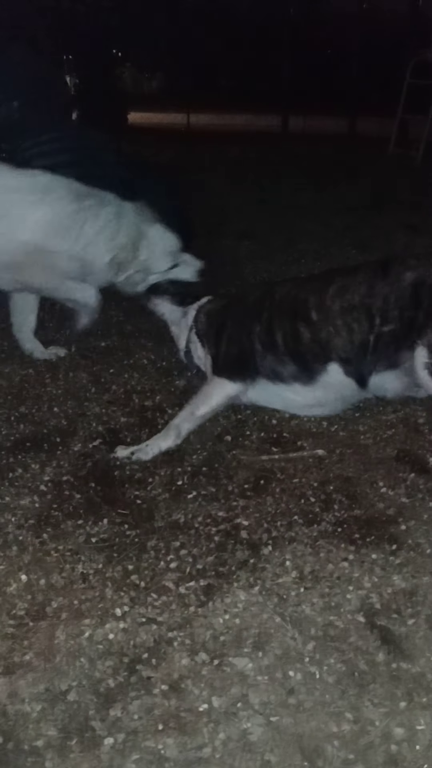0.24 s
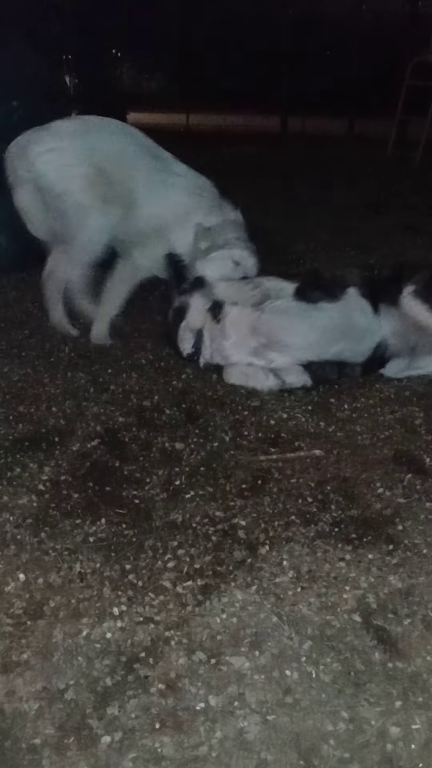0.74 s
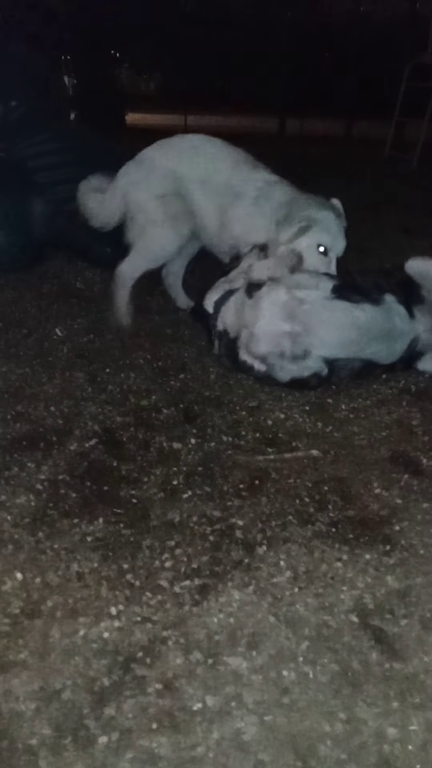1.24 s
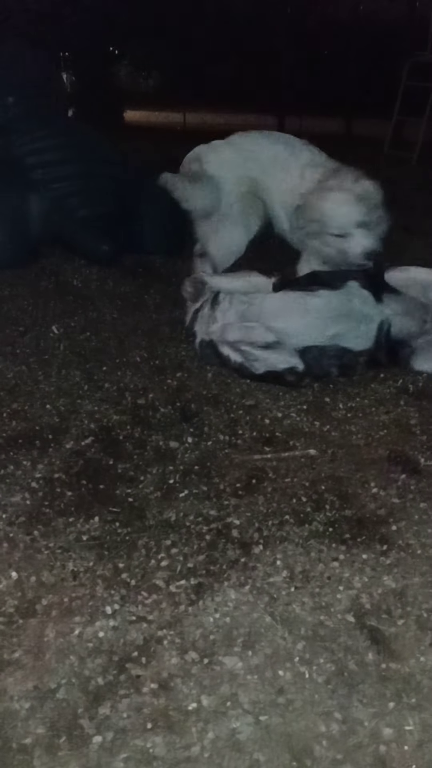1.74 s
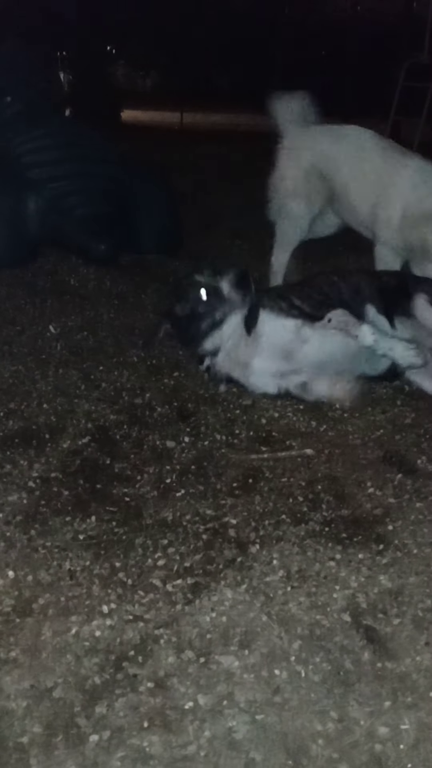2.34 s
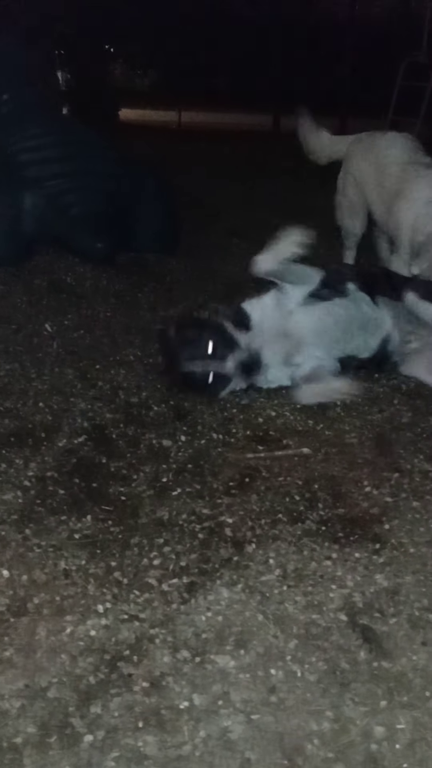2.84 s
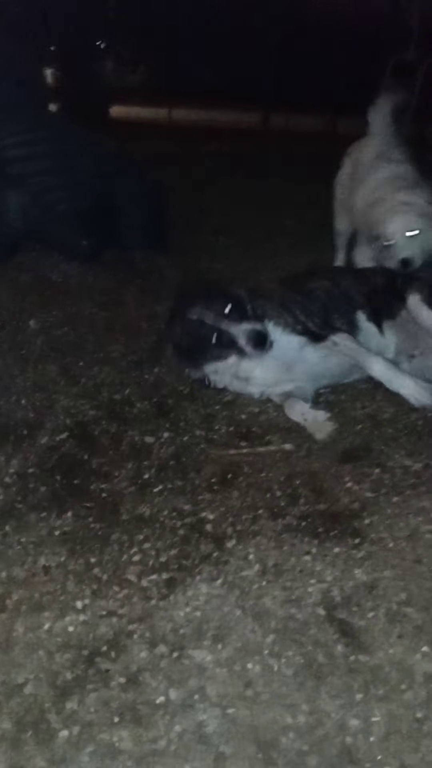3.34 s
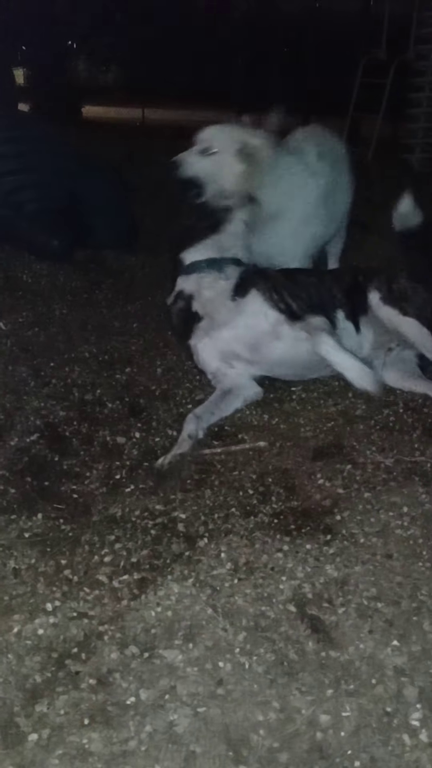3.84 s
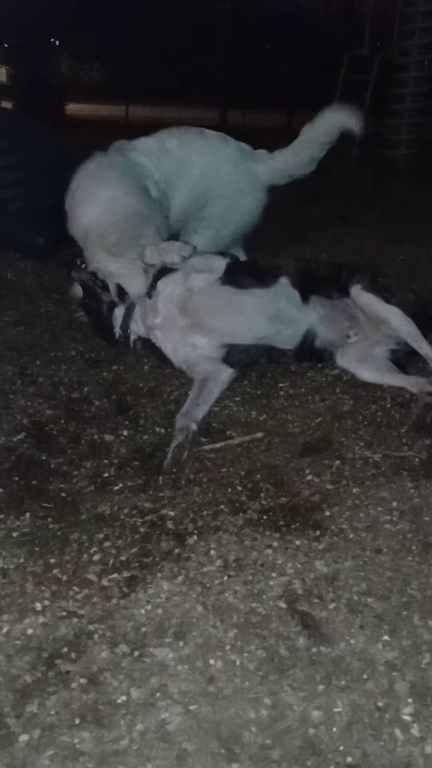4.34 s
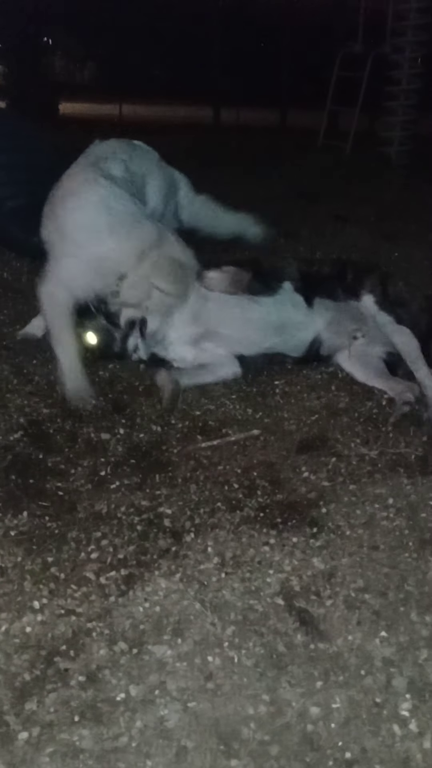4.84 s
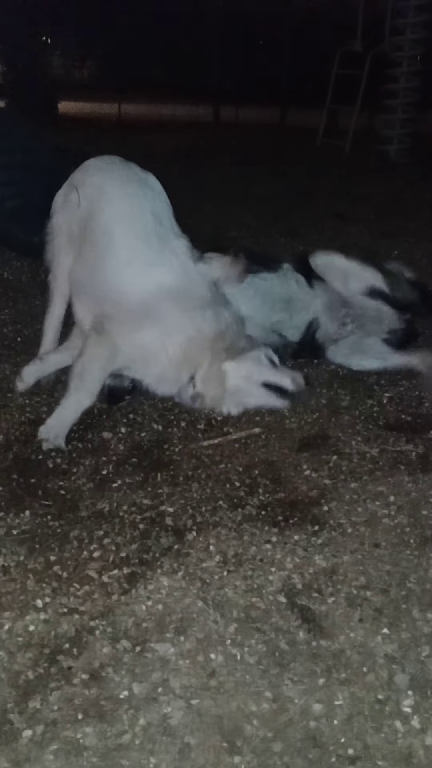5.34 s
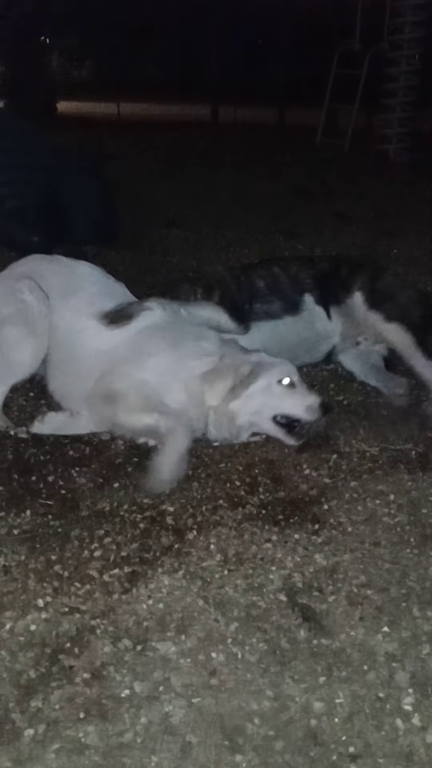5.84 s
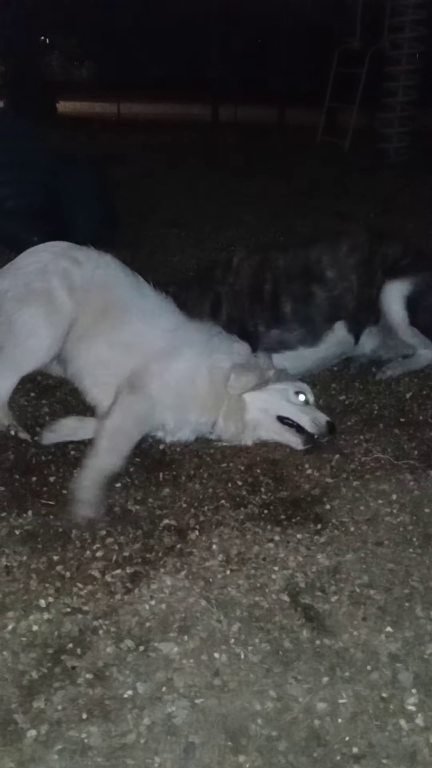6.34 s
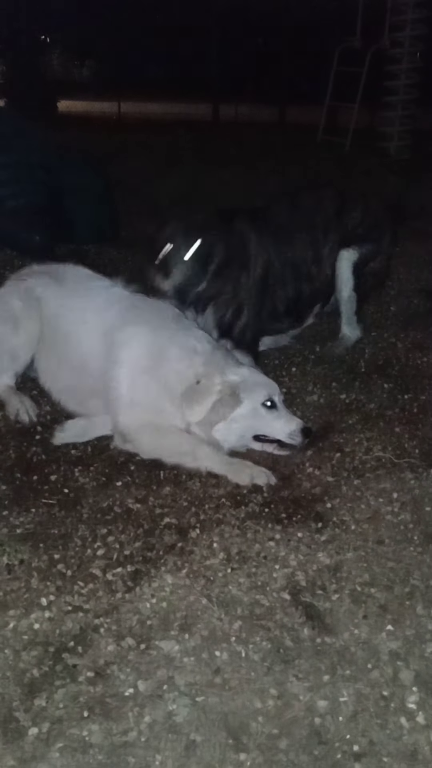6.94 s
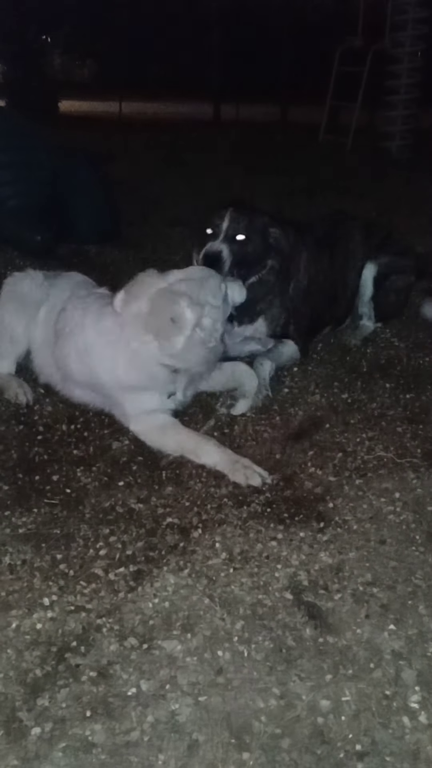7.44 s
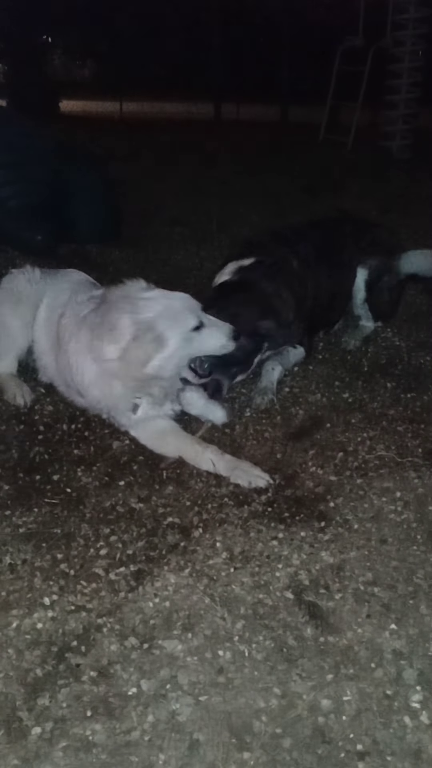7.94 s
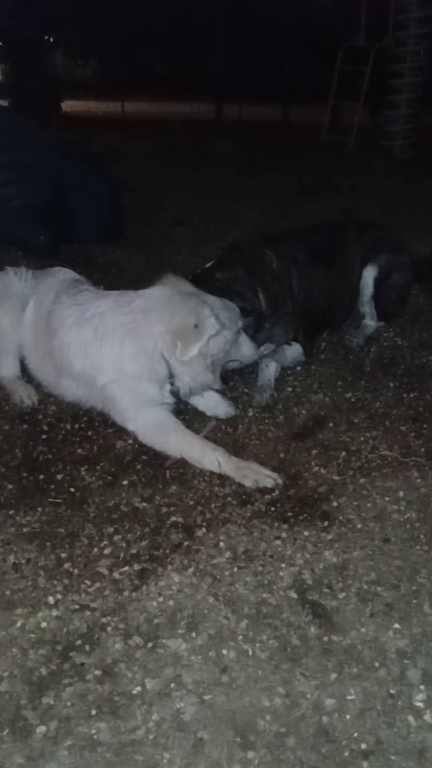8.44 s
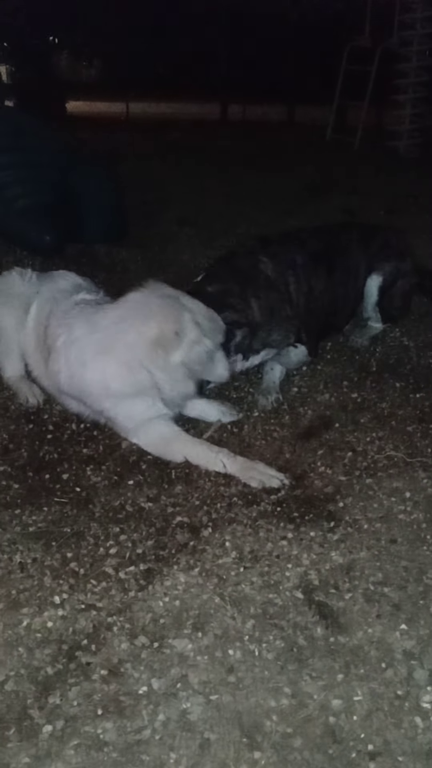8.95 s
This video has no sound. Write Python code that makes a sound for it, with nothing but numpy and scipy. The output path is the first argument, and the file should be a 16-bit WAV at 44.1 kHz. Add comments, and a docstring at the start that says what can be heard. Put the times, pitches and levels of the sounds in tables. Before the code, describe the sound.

Bright gravel scrapes and sudden paw kicks as two dogs wrestle, low breathy growls, hollow mouth snaps and small metallic clinks over faint rumble.

```python
"""Dogs wrestling on gravel

Two dogs wrestle on loose gravel in a quiet yard at night. Bodies and paws grind and kick the stones:
filtered noise and random contacts. Pebbles tick, soft bodies thud, and collar tags ring in decaying modes.
Jaws clop as a brief cavity tone; hoarse huffs and growls are throat pulses and breath through resonances.
Thin squeaks glide as sine tones. A low distant rumble and a faint hiss are steady shaped noise."""
import sys
import numpy as np
from scipy import signal
from scipy.fft import rfft, irfft
from scipy.io import wavfile
from scipy.ndimage import map_coordinates

SR = 44100
rng = np.random.default_rng(int(sys.argv[2]) if len(sys.argv) > 2 else 0)


def store_pcm(level_fs):
    """Save levels as 16-bit WAV."""
    pcm = np.round(np.clip(level_fs, -1, 1) * 32767).astype(np.int16)
    wavfile.write(sys.argv[1], SR, np.atleast_2d(pcm).T)


N = 406161
T = np.arange(N) / SR
# spectrum of stones striking each other at the surface: frequency_hz, level_db
GRAVEL = [(1760, -38), (3000, -16.5), (3570, -17), (4440, -11), (5040, -1.5), (6220, 1), (7350, -10.5),
          (8170, -1), (8520, 0), (10200, -9.5), (11600, -21), (12800, -12.5), (13800, -19), (15100, -11),
          (16000, -43)]


def from_db(db):
    """Level to amplitude ratio: 20 dB is a factor of ten."""
    return 10 ** (np.asarray(db) / 20)


def rms_one(x):
    """Normalization of mean power: scale to unit rms."""
    return x / np.sqrt(np.mean(x ** 2) + 1e-20)


def in_time(rows):
    """Linear interpolation: join (time, value) rows by straight lines."""
    return np.interp(T, *np.transpose(rows))


def drift(rate, size=N):
    """Random modulation: Gaussian knots, rate of them a second up to 1000, joined to a spread near 1."""
    knots = rng.standard_normal(size // 40 + 2)
    return 1.22 * np.interp(np.arange(size) * min(rate, 1000) / SR, np.arange(len(knots)), knots)


def colour(x, spectrum, size=2048):
    """Minimum-phase filtering: a causal unit-energy kernel follows a (Hz, dB) spectrum."""
    hz, db = np.transpose(spectrum)
    grid = np.maximum(np.arange(size // 2 + 1) * SR / size, 1)
    gain = from_db(np.interp(np.log(grid), np.log(hz), db))
    # folding the cepstrum onto positive times makes the kernel causal
    cepstrum = irfft(np.log(gain))
    cepstrum[1:size // 2] *= 2
    cepstrum[size // 2 + 1:] = 0
    kernel = irfft(np.exp(rfft(cepstrum)))
    return signal.oaconvolve(x, kernel / np.linalg.norm(kernel))[:len(x)]


def patchy(x, patchy_db, patch_hz, patch_s, size=512):
    """Time-varying filtering: random bumps in the spectrum keep shifting the colour."""
    hz, s, cells = signal.stft(x, SR, nperseg=size)
    knots = rng.standard_normal((160, 600))
    places = np.meshgrid(hz / patch_hz, s / patch_s, indexing="ij")
    field = map_coordinates(knots, places, order=1, mode="wrap")
    return signal.istft(cells * from_db(patchy_db * (field - 0.0854)), SR, nperseg=size)[1][:N]


def resonate(x, hz, width_hz):
    """Two-pole resonance with gain near 1 on top; damping sets its width."""
    r = np.exp(-np.pi * width_hz / SR)
    numerator = np.array([1, 0, -1]) * (1 - r * r) / 2
    return signal.lfilter(numerator, [1, -2 * r * np.cos(2 * np.pi * hz / SR), r * r], x + 1e-18)


def cut(x, hz, kind, order=2):
    """Butterworth filtering: a maximally flat passband."""
    return signal.sosfilt(signal.butter(order, np.minimum(hz, .45 * SR), kind, fs=SR, output="sos"), x)


def add(track, s, sound):
    """Superposition: mix a sound in at time s."""
    at = int(s * SR)
    track[at:at + len(sound)] += sound[:N - at]


def early_echo(x, echo_s=0.001783, echo_share=0.22):
    """Comb filtering: a close, inverted reflection cuts the midrange into bands."""
    reflection = np.interp(T - echo_s, T, x, left=0)
    return (x - echo_share * reflection) / np.hypot(1, echo_share)


def grains(per_s, spread_db, bed):
    """Random impulse train: contacts of scattered size and sign on a bed of noise."""
    sizes = from_db(spread_db * np.minimum(rng.exponential(1, N), 4.0)) * rng.choice([-1, 1], N)
    clicks = rms_one(sizes * (rng.random(N) < per_s / SR))
    return rms_one(clicks + bed * rng.standard_normal(N))


def heave(s, db, swell_s, fade_s):
    """Power envelope of one movement or breath: it builds up to its strongest at s and dies away."""
    drop_db, roundness = 11, 1.45   # fall over one swell or fade time; 1 = pointed top, 2 = bell
    away = np.maximum((s - T) / swell_s, (T - s) / fade_s)
    near, power = away < 4, np.zeros(N)
    power[near] = from_db(db - drop_db * away[near] ** roundness) ** 2
    return power


def slide_strength():
    """Addition of powers: shuffling, slides and one airy breath drive the surface and deeper layers."""
    # restless shuffling of both dogs, under the separate moves: time_s, crunch_db
    shuffle = [(0.0, -51.5), (0.28, -42.5), (0.72, -46.5), (1.4, -45), (1.7, -52.5), (2.1, -53),
               (2.24, -43), (2.9, -47.5), (3.7, -49.5), (3.98, -45.5), (4.15, -55.5), (4.96, -47.5),
               (5.3, -40.5), (7.35, -40.5), (7.7, -52.5), (8.0, -52), (8.35, -62), (8.7, -56.5)]
    # a body or leg slides through the gravel; the long soft rasp at 8.84 s is a dog's airy breath.
    # time_s is the strongest moment: time_s, crunch_db, swell_s, fade_s, deep_db (against the crunch)
    slides = [(0.55, -45, 0.051, 0.2, -6.5), (0.92, -30.5, 0.088, 0.059, -21.5),
              (1.07, -29.5, 0.12, 0.093, -24), (1.23, -38.5, 0.066, 0.064, -43),
              (1.55, -43, 0.09, 0.084, -9), (1.82, -42, 0.047, .04, -7), (2.0, -43, 0.1, 0.064, -7),
              (2.58, -31, 0.091, 0.12, -15.5), (2.811, -25.5, 0.078, 0.045, -7),
              (3.06, -33, 0.059, 0.029, -21), (3.23, -35, 0.12, 0.056, -38), (3.53, -40, 0.075, 0.12, -10),
              (4.29, -42, 0.097, 0.085, -13.5), (4.62, -41, 0.07, 0.049, -16),
              (4.79, -47, 0.053, 0.11, -4.5), (5.21, -32.5, 0.094, .1, -12.5),
              (5.37, -35, 0.068, 0.054, -38), (5.9, -31, 0.12, 0.062, -24), (6.03, -33.5, 0.12, .07, -17),
              (6.55, -39.5, 0.056, 0.28, -6.5), (6.7, -33, 0.1, 0.037, -12.5), (6.87, -36, 0.22, 0.13, -47),
              (7.139, -27, 0.046, 0.034, -17), (7.32, -35.5, 0.097, 0.055, -16),
              (8.84, -57.5, 0.53, 0.39, 2), (9.19, -48.5, 0.084, 0.087, -30)]
    shuffle_depth_db = -10.5   # deep stones against the crunch
    surface = from_db(in_time(shuffle)) ** 2
    deep = surface * from_db(shuffle_depth_db) ** 2
    for s, db, swell_s, fade_s, depth_db in slides:
        power = heave(s, db, swell_s, fade_s)
        surface = surface + power
        deep = deep + power * from_db(depth_db) ** 2
    return np.sqrt(surface), np.sqrt(deep)


def kick_strength():
    """Impulsive excitation: a paw digs in at once, pushes for a moment, and the stones settle."""
    # paws kicking into the gravel: start_s, level_db, length_s
    paw_kicks = [(0.213, -30.5, 0.031), (0.257, -35.5, 0.031), (0.433, -36, 0.029), (1.841, -35, 0.0094),
                 (2.145, -26.5, 0.04), (2.207, -31, 0.0088), (2.305, -35, 0.035), (2.464, -33, .026),
                 (2.908, -32.5, .008), (3.57, -33, .019), (3.814, -35, 0.029), (3.971, -31.5, 0.007),
                 (4.229, -30.5, 0.021), (5.002, -34.5, 0.032), (5.142, -31, 0.012), (6.409, -32, 0.057),
                 (6.827, -15, 0.0031), (6.842, -30, .013), (6.885, -28.5, 0.036), (7.153, -27.5, 0.013),
                 (7.511, -36.5, 0.014)]
    rise_s, push_share, settle_share = 0.00072, 0.46, 0.59   # shares of the length
    power, t = np.zeros(N), np.arange(SR // 3) / SR
    for s, db, length in paw_kicks:
        settling = np.maximum(t / length - push_share, 0) / settle_share
        strength = from_db(db) * np.minimum(t / rise_s, 1) * np.exp(-settling)
        add(power, s, strength ** 2)
    return np.sqrt(power)


def gravel():
    """Granular friction, and one breath as like noise: fine stones lift the treble, weight grinds deep."""
    # fineness of the stones where the dogs lie; each band takes a share of it: time_s, fineness_db
    fineness = [(0.0, -1.5), (0.3, 2), (0.72, 1.5), (0.85, -1), (1.15, -1), (1.6, -1.5), (2.64, -1.5),
                (2.82, -9.5), (2.93, -1), (4.5, 2), (4.92, -1.5), (5.05, 2.5), (6.44, -1), (7.2, 2.5),
                (9.21, 1)]
    # spectrum of the stones below the surface: frequency_hz, level_db
    deep_stones = [(300, -26.5), (600, -13.5), (1100, -14.5), (1450, -3.5), (1700, -4), (2050, 3.5),
                   (2750, 3.5), (3500, -11.5), (4600, 2.5), (6000, -25)]
    kicks, (surface, deep) = kick_strength(), slide_strength()

    slide = surface * from_db(1.56 * drift(90)) * grains(per_s=1000, spread_db=3.0, bed=1.0)
    contacts = slide + kicks * grains(per_s=5800, spread_db=6.0, bed=0.79)
    crunch = patchy(colour(contacts, GRAVEL), patchy_db=3.0, patch_hz=339.2, patch_s=.05)

    # zero-phase filters split the crunch at 7.2 and 11.2 kHz
    fine_db = in_time(fineness) + 1.45 * drift(60)
    below_7k, below_11k = [signal.sosfiltfilt(signal.butter(4, hz, fs=SR, output="sos"), crunch)
                           for hz in (7200, 11200)]
    low = below_7k * from_db(-.45 * fine_db)
    treble = (below_11k - below_7k) * from_db(1.2 * fine_db)
    top = (crunch - below_11k) * from_db(0.42 * fine_db)

    grinding = deep * grains(per_s=500, spread_db=3.0, bed=1.0)
    grinding = grinding + from_db(-14.5) * kicks * rng.standard_normal(N)
    ground = early_echo(colour(grinding, deep_stones))
    return low + treble + top + patchy(ground, patchy_db=5.0, patch_hz=196.2, patch_s=.06)


def pebbles():
    """Impact noise: each knock is a sharp tick with a brief, weaker tail of coloured noise."""
    # single pebbles knocking together; peaks lie 6 dB under the level: start_s, level_db
    knocks = [(0.300, -27), (1.109, -7.5), (1.203, -13), (1.388, -21), (1.438, -16), (2.308, -25),
              (2.385, -20.5), (2.487, -14), (2.982, -17), (3.050, -19), (6.894, -4), (6.900, -12),
              (6.921, -14), (7.021, -21), (8.045, -37)]
    t = np.arange(SR // 100) / SR
    out = np.zeros(N)
    for s, db in knocks:
        envelope = np.exp(-t / 0.00069) + 0.28 * np.exp(-t / 0.005)
        tick = colour(rng.standard_normal(len(t)) * envelope, GRAVEL)
        add(out, s, from_db(db - 6.0) * tick / np.abs(tick).max())
    return out


def tumble():
    """Low-frequency impact: soft heavy bodies bump and roll on packed earth."""
    # a body drops or rolls onto the earth, time_s being its hardest push: time_s, level_db
    rolls = [(5.2, -51.5), (5.62, -54), (5.79, -43), (6.3, -48.5), (6.56, -50), (6.83, -45), (6.93, -45)]
    bumps = grains(per_s=56, spread_db=-2.5, bed=0.36)
    strength = np.sqrt(sum(heave(s, db, swell_s=0.085, fade_s=0.083) for s, db in rolls))
    return strength * rms_one(cut(bumps, [115, 270], "band"))


def throat(size, hoarse, flutter_hz=85):
    """Relaxation oscillation: slack folds flap unevenly, each flap passing a pulse and a puff of air."""
    cycles = np.cumsum(flutter_hz * np.exp(.35 * drift(150, size))) / SR + rng.random()
    pulses = np.diff(np.floor(cycles), prepend=0) * from_db(2.5 * drift(120, size))
    puffs = rng.standard_normal(size) * (.4 + np.exp(-3.0 * (cycles % 1)))
    return rms_one(pulses) * 0.19 + hoarse * rms_one(puffs)


def growls_and_thud(mouth_width_hz=290, upper_width_hz=950, chest_hz=350, chest_width_hz=420):
    """Source-filter principle: pulses and breath drive four resonances, for the voices and one body thud."""
    # huffs and growls, and at 2.811 s the dull thud of a body hit; swell_share is the part of the
    # length spent swelling, upper_db and chest_db are relative to the mouth (main) resonance:
    # start_s, length_s, swell_share, level_db, mouth_hz, upper_db, chest_db
    bursts = [(0.0, 0.16, 0.57, -57, 600, 9, -20), (0.09, 0.12, 0.29, -46.5, 820, 1, -2),
              (1.788, 0.093, 0.46, -47, 890, -3, -9), (2.275, 0.097, 0.42, -53.5, 890, 5.5, -17),
              (2.409, .09, 0.42, -58, 840, 6, -1), (2.756, 0.11, 0.5, -48.5, 900, 5, -12),
              (2.811, .04, 0.43, -43.5, 550, -3, -9), (3.596, 0.2, 0.28, -54.5, 1110, 5, -21),
              (3.814, 0.087, 0.67, -43.5, 870, 0, -16), (3.92, 0.12, .5, -51, 840, 1.5, -23),
              (4.034, .09, 0.34, -41.5, 1004, -4, -15.5), (4.168, .085, .45, -49, 840, -10, -35),
              (4.266, .125, 0.51, -46, 940, -4, -10.5), (5.579, 0.1, 0.21, -45, 890, 5.5, 2.5),
              (5.746, 0.1, 0.43, -49, 950, 6, 2.5), (6.055, 0.052, 0.41, -47, 670, -10, -3),
              (6.234, 0.088, 0.86, -43, 830, 3, -4), (6.39, 0.092, 0.47, -56.5, 800, 4, 0.5),
              (6.487, 0.13, 0.41, -51, 860, 8.5, -1), (6.76, .13, 0.5, -49, 740, 6.5, -0.5),
              (6.861, 0.039, 0.37, -39.5, 676, -3, -3), (6.9, 0.067, 0.52, -50, 650, -10, 3),
              (6.972, 0.099, .55, -55, 780, -17, -8), (7.272, 0.23, 0.27, -53, 780, 1.5, -8.5),
              (7.556, .16, 0.23, -50.5, 950, -1.5, -17), (7.661, 0.17, 0.41, -49, 1110, -0.5, -6.5),
              (7.679, 0.1, 0.46, -56.5, 580, -12, -13), (7.805, 0.23, 0.29, -59, 750, 4, -14),
              (8.002, .13, 0.46, -52.5, 630, 7.5, -2.5), (8.136, 0.074, 0.4, -55, 744, 6, -15),
              (8.119, 0.32, 0.39, -55, 560, -7, -6), (8.351, .26, 0.55, -54.5, 556, -22, -7),
              (8.652, 0.088, .55, -62.5, 547, -2, 5), (8.938, 0.14, 0.44, -60.5, 650, 2, -18)]
    upper_hz = 2156
    middle_hz, middle_width_hz, middle_db = 1403, 270, -5.5   # level relative to the upper one
    out = np.zeros(N)
    for start, length, swell, db, mouth_hz, upper_db, chest_db in bursts:
        t = np.arange(int(length * SR)) / SR
        source = throat(len(t) + SR // 10, hoarse=0.99)
        source = patchy(source, patchy_db=5.5, patch_hz=129.1, patch_s=0.042, size=1024)[:len(t)]
        ramp = np.interp(t / length, [0, np.clip(swell, .05, .95), 1], [0, 1, 0])
        effort = np.sin(np.pi / 2 * ramp) ** 1.43
        # a chesty huff opens the throat and damps the resonances; widths are as named at 9 dB of chest
        blur = from_db(0.024 * (chest_db - 9.0))
        parts = [(mouth_hz, mouth_width_hz * blur, 0),
                 (middle_hz, middle_width_hz, upper_db + middle_db),
                 (upper_hz, upper_width_hz * blur, upper_db),
                 (chest_hz, chest_width_hz, chest_db)]
        for hz, width, part_db in parts:
            resonance = resonate(resonate(source, hz, width), hz, width)
            add(out, start, from_db(db + part_db) * effort * rms_one(resonance))
    return out


def jaws(swell_s=.003, rise=0.018):
    """Cavity resonance: the mouth sounds for a few cycles, rising a little as it closes."""
    # jaws closing on a hollow mouth: start_s, level_db, cavity_hz
    clops = [(1.8165, -16, 885), (1.839, -36, 920), (2.82, -21.5, 1170), (3.870, -28, 880),
             (3.882, -26.5, 880), (4.080, -30.5, 960)]
    out, t = np.zeros(N), np.arange(SR // 40) / SR
    age = t / swell_s
    for s, db, hz in clops:
        phase = 2 * np.pi * np.cumsum(hz * (1 + rise * np.tanh(age - 1))) / SR
        clop = age * np.exp((1 - age ** 2) / 2) * np.sin(phase)
        smack = 0.17 * cut(rng.standard_normal(len(t)), [1700, 5500], "band") * np.exp(-t / 0.012)
        add(out, s, from_db(db) * (clop + smack))
    return out


def tags(strike_db=1.0, strike_s=0.0016, click_db=2.0, click_s=0.002, vary_db=1.5):
    """Modal vibration: metal tags buzz shortly; modes drop fast while they touch, then ring on."""
    # modes of each collar tag, by tag name: mode_hz, level_db, t60_s
    tag_modes = {"bright": [(7260, 2.5, 0.06), (8400, -15.5, 0.15), (8800, -13, .08), (9930, -5, 0.045),
                 (13150, -18, .05), (15400, -15, .12)], "short": [(7280, 0, 0.041), (8630, 8.5, 0.058),
                 (9360, 4, 0.048), (11640, -3.5, 0.066)], "large": [(2160, -25.5, 0.13), (6200, -24, 0.17),
                 (6788, -10, 0.16), (8170, -18, 0.17), (9850, -19.5, 0.19), (12530, -20, 0.11),
                 (14490, -31, .15)]}
    # tag clinks: start_s, level_db, tag name
    clinks = [(0.347, -40, "short"), (0.364, -49.5, "bright"), (1.271, -32.5, "bright"),
              (2.933, -41.5, "short"), (3.25, -31, "bright"), (3.288, -36, "bright"),
              (3.33, -25.5, "bright"), (3.352, -30, "bright"), (3.370, -26.5, "bright"),
              (3.413, -39, "short"), (3.564, -28, "bright"), (4.506, -38, "short"), (4.617, -32, "bright"),
              (4.837, -22.5, "large"), (4.846, -15, "large"), (4.871, -36, "bright"),
              (7.159, -31.5, "bright"), (8.501, -59, "short")]
    # spectrum of the contact buzz: frequency_hz, level_db
    buzz_spectrum = [(1500, -24), (2500, -6), (4500, 6), (6500, 9.5), (9000, -9), (12000, -7), (16000, -24)]
    out, t = np.zeros(N), np.arange(SR // 3) / SR
    for s, db, which in clinks:
        buzz = colour(rng.standard_normal(len(t)), buzz_spectrum)
        sound = from_db(click_db) * buzz * np.exp(-t / click_s) / 2
        for hz, mode_db, t60 in tag_modes[which]:
            ring = 0.95 * np.exp(-np.log(1000) * t / t60)
            envelope = ring + from_db(strike_db) * np.exp(-t / strike_s)
            gain = from_db(mode_db + vary_db * rng.normal())
            mode_hz = hz * (1 + 0.0033 * rng.normal())
            sound += gain * envelope * np.sin(2 * np.pi * mode_hz * t)
        add(out, s, from_db(db) * sound * np.minimum(t / 0.001, 1))
    return cut(out, 1400, "high", order=4)


def squeaks(waver=0.031, waver_at_hz=2000):
    """Frequency modulation: thin wavering tones glide and fade at both ends."""
    # thin whines, squeaks and a faint high whistle, one list each: time_s, pitch_hz, level_db
    glides = [
        [(3.71, 2990, -57), (3.77, 3030, -49), (3.83, 2650, -56)],
        [(4.38, 1410, -62), (4.49, 1440, -52), (4.58, 1450, -63)],
        [(5.07, 2650, -38), (5.11, 2470, -48), (5.19, 2534, -48)],
        [(8.52, 9000, -61), (8.6, 11100, -77), (8.8, 11400, -79), (9.03, 10400, -68), (9.12, 9100, -61)],
    ]
    out = np.zeros(N)
    for rows in glides:
        s, hz, db = np.transpose(rows)
        t = np.arange(s[0], s[-1], 1 / SR)
        depth = waver * np.sqrt(waver_at_hz / hz[0])   # higher tones waver by a smaller share
        pitch = np.interp(t, s, hz) * (1 + depth * drift(520)[:len(t)])
        level = from_db(np.interp(t, s, db) + 2.7 * drift(63)[:len(t)])
        level = level * signal.windows.tukey(len(t), .2)
        add(out, s[0], level * np.sin(2 * np.pi * np.cumsum(pitch) / SR))
    return out


def yard(x):
    """Diffuse reverberation: nearby walls and clutter scatter a faint short tail."""
    t = np.arange(SR // 4) / SR
    decay = np.exp(-np.log(1000) * t / .12)   # 60 dB in 0.12 s
    tail = cut(rng.standard_normal(len(t)), 9000, "low") * decay * (t > .004)
    return x + from_db(-17.5) * signal.oaconvolve(x, tail / np.linalg.norm(tail))[:N]


def night(rumble_db=-49, air_db=-64):
    """Stationary shaped noise: a steady distant rumble and a faint hiss."""
    # spectrum of the distant rumble: frequency_hz, level_db
    rumble_spectrum = [(15, -44), (25, -47), (38, -13.5), (56, -19.5), (69, -0.5), (124, 0.5), (188, -4.5),
                       (265, -14), (325, -20.5), (414, -34.5), (520, -35), (680, -73), (1140, -120)]
    # spectrum of the hiss: frequency_hz, level_db
    air_spectrum = [(400, 4.5), (1000, 3.5), (1500, -2), (2050, 24), (2800, -25), (3600, 7), (5500, 10),
                    (9000, 7.5), (12000, -36), (16000, -42)]
    rumble = from_db(rumble_db) * colour(rng.standard_normal(N), rumble_spectrum, size=16384)
    hiss = from_db(air_db) * colour(rng.standard_normal(N), air_spectrum)
    return rumble + hiss


def scene():
    """Superposition: the scuffle in the yard, over the night background."""
    ground = gravel() + pebbles() + tumble()
    dogs = tags() + jaws() + early_echo(growls_and_thud()) + squeaks()
    return (yard(ground + dogs) + night())[None]


def record(dry, dip_hz=3650, dip_width_hz=550, dip=0.25, cutoff_hz=16300):
    """Frequency response: the microphone dips in the low treble, and the top is cut steeply."""
    coloured = dry - dip * resonate(dry, dip_hz, dip_width_hz)
    return signal.sosfilt(signal.ellip(10, .2, 80, cutoff_hz, fs=SR, output="sos"), coloured)


dry = scene()
out = record(dry)
store_pcm(out)
```